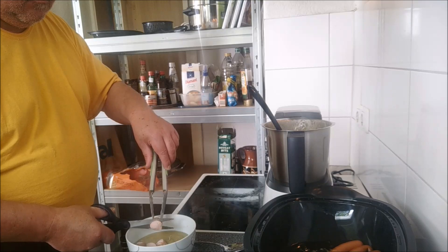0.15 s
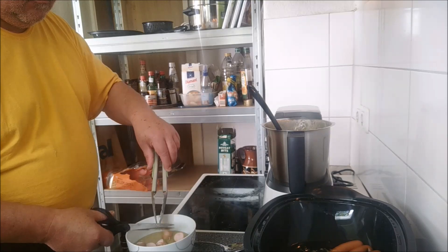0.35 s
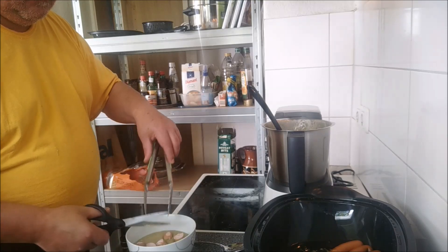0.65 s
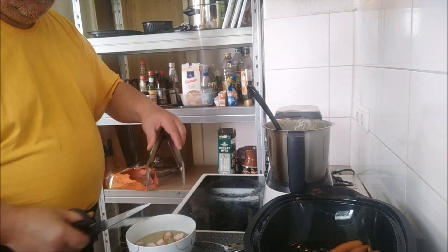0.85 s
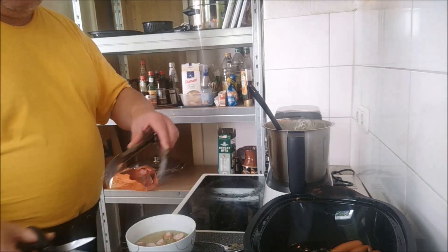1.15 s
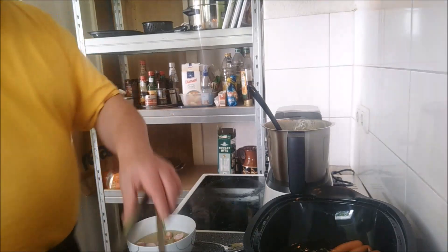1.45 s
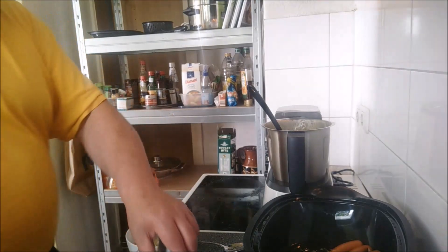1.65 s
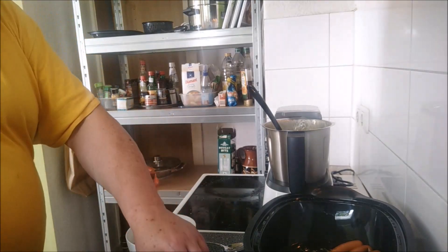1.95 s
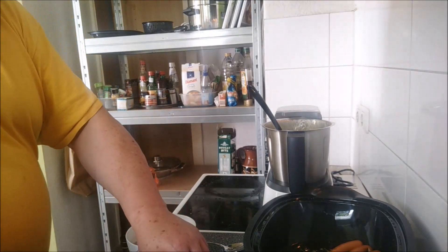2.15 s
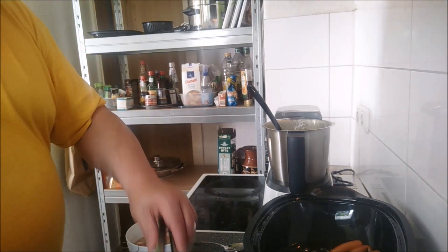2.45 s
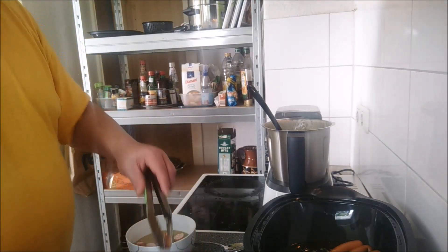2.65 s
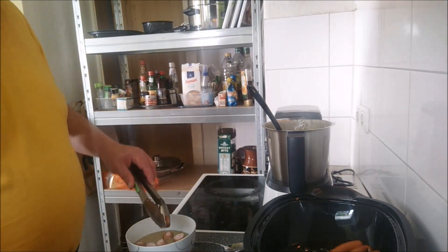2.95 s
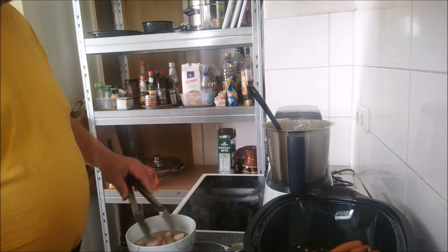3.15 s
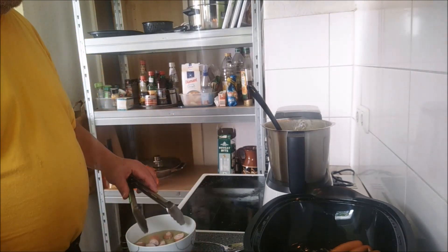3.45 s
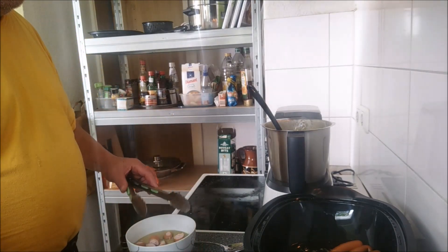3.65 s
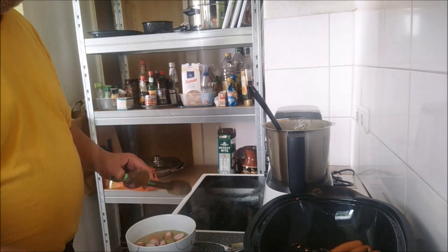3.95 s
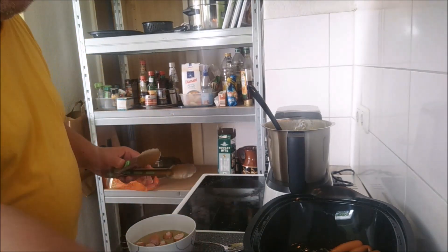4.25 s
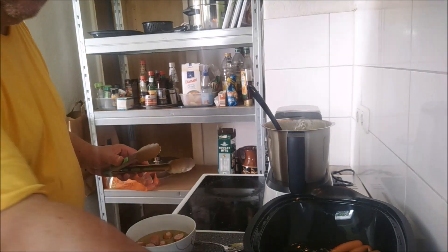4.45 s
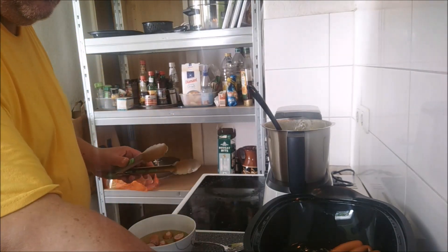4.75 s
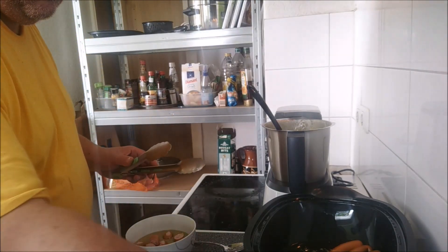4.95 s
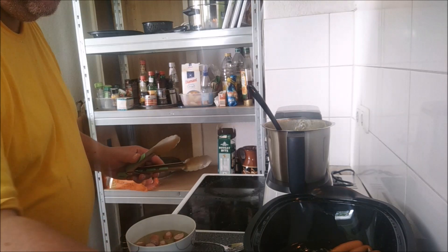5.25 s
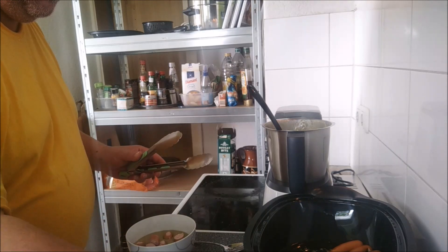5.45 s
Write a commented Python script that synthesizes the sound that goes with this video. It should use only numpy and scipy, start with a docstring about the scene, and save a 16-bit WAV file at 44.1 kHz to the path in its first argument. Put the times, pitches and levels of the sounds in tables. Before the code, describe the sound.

Scissors snip a sausage with a sharp steel click, then slide onto a counter before metal tongs click and clatter in a small tiled kitchen.

```python
"""Steel taps lead: kitchen scissors snip a sausage over a bowl, and tongs click and clatter.
Each tap is a short noise crack with thin rings, a body knock and an answering board; some thump the worktop.
Sleeves and blades rub as gritty noise; the scissors slide onto the counter and are pushed aside.
Small tiled kitchen with a quiet hum of shaped noise; random echoes make the room.
Two microphone ports close together; the recorder widens the stereo bass."""
import sys
import numpy as np
from scipy import signal
from scipy.fft import rfft, irfft
from scipy.io import wavfile
from scipy.ndimage import uniform_filter1d

SR = 44100
rng = np.random.default_rng(int(sys.argv[2]) if len(sys.argv) > 2 else 0)


def wav_out(sig):
    """Save sig, one row per channel (or a flat mono array), as 16-bit PCM at SR to the path in sys.argv[1]."""
    wavfile.write(sys.argv[1], SR, np.round(np.clip(np.atleast_2d(sig).T, -1, 1) * 32767).astype(np.int16))


N = 247312  # length [samples]


def amp(db):
    """Turns decibels into gain."""
    return 10 ** (np.asarray(db) / 20)


def evened(x):
    """Scales to rms 1."""
    return x / np.sqrt(np.mean(x ** 2) + 1e-20)


def peaked(x, db):
    """Scales to a peak level in dB."""
    return amp(db) * x / np.abs(x).max()


def read(points, hz):
    """Reads a table over frequency, on a log frequency axis."""
    f, value = np.transpose(points)
    return np.interp(np.log(hz + 1), np.log(f + 1), value)


def colour(x, points):
    """Filters by a table of dB over frequency, without delay."""
    size = x.shape[-1]
    gain = amp(read(points, np.fft.rfftfreq(size, 1 / SR)))
    return irfft(rfft(x) * gain, size)


def curve(points):
    """Reads a (time, level) table at every sample."""
    times, levels = np.transpose(points)
    return np.interp(np.arange(N) / SR, times, levels)


def ring(t, hz, db, t60):
    """A struck mode: a sine that loses 60 dB in t60 seconds."""
    return amp(db - 60 * t / t60) * np.sin(2 * np.pi * hz * t)


def grit(grain_db, size):
    """Stereo noise whose loudness jumps from one snag of the surface to the next."""
    snags = evened(uniform_filter1d(rng.standard_normal(N), size))
    return evened(rng.standard_normal((2, N)) * amp(grain_db * snags))


def tap(row, noise, lead):
    """A crack of tiny contacts in steel; the struck body knocks and the board under it answers.

    Gives the sound heard straight and the sound sent to the walls, which sums all directions to an even click.
    """
    # broad humps of hand-damped steel: (frequency [Hz], level [dB])
    steel = [(4800, -6), (5000, -1), (5600, -1), (6500, -2), (7900, 1), (9000, -4)]
    # thin rings of the steel: (frequency [Hz], level [dB], t60 [s])
    tines = [(3910, -8, 0.034), (4850, -2, 0.053), (5290, -7.5, 0.036), (5970, -17, 0.045),
             (7100, -22, 0.02), (8200, -19, 0.023), (8970, -6, 0.029), (10500, -12, 0.032),
             (11700, -12, 0.027)]
    # shelf board or bowl under the blow: (frequency [Hz], level [dB], t60 [s])
    board_modes = [(571, -24, 0.084), (586, -6.5, 0.044), (747, 6, 0.021), (825, -5, 0.024)]
    dip_db = -4.5  # the crack near 4 kHz, below the steel humps

    _, crack_db, heft_db, edge_db, knock_hz, knock_db, board_db = row
    t = np.arange(len(noise)) / SR
    spectrum = [(900, heft_db - 46), (2300, heft_db), (3300, heft_db), (3600, dip_db), (4400, dip_db),
                *steel, (10000, edge_db), (15600, edge_db - 7.0)]

    burst = noise * amp(-60 * t / 0.011)
    burst /= np.linalg.norm(burst)
    click = 1.0 * (t == 0)
    rings = np.zeros(len(t))
    # each tap excites each ring a little differently
    for (hz, db, t60), grip in zip(tines, noise[-len(tines):]):
        rings += ring(t, hz, db - 36 + 3 * grip, t60)
    # the lead leaves room for the filter's pre-ringing
    crack = colour(np.roll([burst + rings, click + rings], lead, 1), spectrum)

    knock = ring(t, knock_hz, 0, 15 / knock_hz)
    knock += ring(t, 1.44 * knock_hz, -16, 0.014)
    knock += ring(t, 0.85 * knock_hz, -9, 0.016)
    knock *= (1 - np.exp(-2 * t * knock_hz)) ** 2  # a soft contact takes about a cycle

    board = sum(ring(t, *mode) for mode in board_modes)
    board *= (1 - np.exp(-t / 0.0008)) ** 2

    body = peaked(knock, knock_db - 1.5) + peaked(board, board_db - 11.0)
    body_share = amp([[3], [-2.5]])  # straight, to the walls
    return amp(crack_db) * (peaked(crack, 7.4) + np.roll(body, lead) * body_share)


def taps():
    """Every tap, straight to both ports and through the room; taps take turns through three random echo patterns."""
    # taps of scissors and tongs; levels stand ahead of the fixed offsets in tap() and below:
    # (time [s], crack level [dB], heft: crack filter at 2.3-3.3 kHz [dB], edge: crack filter at 10 kHz [dB],
    #  knock frequency [Hz], knock level re crack level [dB], board level re crack level [dB])
    strikes = [(0.2434, -40.5, -14, 21, 2135, -5.5, -36), (0.2533, -38, -22, 9, 1440, -19, -34),
               (0.2821, -22, -17, -1, 1720, -32, -49), (0.832, -51, 1, -9, 1000, -2, 0),
               (1.3879, -35.5, 0, -11, 1770, -13.5, -6.5), (1.9315, -38, 8, -28, 1660, 10.5, 11.5),
               (2.9153, -72.5, -11, -9, 1470, 13, -4), (3.2012, -33.5, -28, -0.5, 2087, -12.5, -17),
               (3.3098, -40, -11, -20, 1780, -27, -47), (3.3692, -13, 0, -2.5, 1370, -12.5, -15.5),
               (3.5162, -46, -6, -2.5, 1440, -10, -11), (3.5968, -44.5, 2, -4, 1390, -8, -8),
               (3.6406, -43, 0, -4.5, 1310, -9, -8), (3.777, -60.5, 8, -12, 1750, 8, 0),
               (3.8443, -24.5, 3, 7.5, 1213, -6.5, 3.5), (4.0048, -50.5, -22, 0, 1410, -8, 4),
               (4.0444, -68, -12, -9, 1250, 12, 21), (4.4352, -50.5, 3.5, -31, 1170, 7, 1),
               (4.5335, -23.5, -0.5, -9, 1675, -4.5, -10.5), (4.572, -14, -4.5, -4, 1652, -12, -54),
               (4.6186, -12, -9, 1, 1370, -17.5, -57), (4.708, -33.5, -3, -5, 960, -20, -36),
               (4.7399, -32, -10, -28, 1240, -14, -40), (4.8298, -22, 3, -1, 1830, -7, -54),
               (4.8819, -15, -3, 3, 1646, -16.5, -44), (5.0182, -26, 2.5, -3.5, 1630, 2.5, -35)]
    lag, lead = 7, 40  # the left port hears a tap this late; each tap is placed this early [samples]
    pan = amp([[2], [-2]])  # left over right by 4 dB

    straight, sends = np.zeros((2, N)), np.zeros((3, 2, N))
    noise = rng.standard_normal((len(strikes), 4096))
    for k, row in enumerate(strikes):
        near, sent = tap(row, noise[k], lead)
        start = round(row[0] * SR) - lead
        span = slice(start, start + len(near))
        straight[:, span] += [near, np.roll(near, -lag)] * pan
        sends[k % 3, :, span] += sent * pan
    echoes = sum(room(send) for send in sends)
    return amp(1.0) * straight + amp(7.5) * echoes


def thumps():
    """Heavier taps shake the worktop under the recorder, which one port feels far more than the other."""
    # blows that reach the worktop: (time [s], level ahead of the thump's own peak level [dB])
    hits = [(1.3873, -34.5), (1.9318, -54.5), (3.3689, -50.5), (3.6395, -56), (3.8454, -41),
            (4.0043, -58.5)]
    # modes of the worktop: (frequency [Hz], level [dB], t60 [s])
    counter = [(71.4, -6, 0.054), (119, -4.5, 0.075), (157, 1, 0.042), (265.3, 1.5, 0.062),
               (320, 10.5, 0.016)]

    t, blows = np.arange(SR) / SR, np.zeros(N)
    for time, db in hits:
        blows[round(time * SR)] = amp(db)
    thump = sum(ring(t, *mode) for mode in counter)
    thump *= (1 - np.exp(-t / 0.0035)) ** 2  # soft onset
    shaken = signal.oaconvolve(blows, peaked(thump, 4.8))[:N]
    felt = shaken * np.array([[0.9], [-0.15]])  # the right port moves the opposite way
    return felt + amp(-3.0) * room(felt)


def rubbing():
    """Cloth and blades rub: a gritty hiss with a duller part under it; each stroke swells, holds and dies."""
    # strokes of blade or sleeve, levels ahead of the straight and room gains:
    # (time at full level [s], swell [s], held [s], hiss level [dB], duller part re hiss [dB])
    rubs = [(0.243, 0.021, 0.0029, -49, -10), (0.28, 0.007, 0.0035, -56, -17),
            (0.783, 0.073, 0.15, -62, -7.5), (0.938, 0.04, 0.048, -54.5, -16),
            (1.059, 0.1, 0.0073, -52.5, -13.5), (1.168, 0.077, 0.0057, -71, -10),
            (1.4, .01, 0.031, -59, -3), (1.601, 0.056, 0.0055, -42, -9.5),
            (3.854, 0.018, 0.0017, -45.5, 1.5), (3.897, 0.033, 0.0019, -46.5, -1.5),
            (4.53, 0.083, 0.051, -55.5, 2.5), (4.739, 0.039, 0.0065, -52, -7.5),
            (4.88, 0.041, 0.045, -52, -1.5)]
    # clothes moving all along: (time [s], level [dB])
    rustle = [(0.0, -83.5), (0.76, -80), (1.54, -81.5), (1.78, -73), (1.89, -55), (2.01, -55.5),
              (2.14, -60), (2.46, -67.5), (2.65, -73.5), (3.3, -78), (3.48, -65), (3.65, -70.5),
              (4.27, -78), (4.49, -72), (4.7, -58), (5.04, -55), (5.12, -65.5), (5.6, -66)]
    # spectrum of the hiss: (frequency [Hz], density [dB per Hz])
    hiss_spectrum = [(1470, -18), (2500, -15.5), (3430, -12.5), (4380, -5.5), (4780, -9.5), (8040, -3.5),
                     (14200, -11), (16100, -35), (16500, -54)]
    # spectrum of the duller part: (frequency [Hz], density [dB per Hz])
    dull_spectrum = [(120, -79), (200, -13.5), (727, -6.5), (1170, 0), (1260, -2), (1660, -1), (4000, -11),
                     (5200, -14), (8800, -120)]
    swell_db, fall_db_per_s = 30, 344  # climb during the swell; dying away after the hold

    hiss = evened(colour(grit(0.95, size=60), hiss_spectrum))
    dull = evened(colour(grit(1.3, size=200), dull_spectrum))
    t, strokes = np.arange(N) / SR, np.zeros((2, N))
    for full, swell, held, hiss_db, dull_db in rubs:
        before = np.maximum(full - t, 0)
        after = np.maximum(t - full - held, 0)
        below_db = swell_db / swell * before + fall_db_per_s * after
        strokes += amp(hiss_db - below_db) * (hiss + dull * amp(dull_db))
    # the same noise with its ports swapped
    clothes = amp(curve(rustle)) * (hiss + dull * amp(-1.0))[::-1]
    return amp(-3.0) * strokes + amp(-1.5) * room(strokes) + clothes


def scrape(points, resonances, grain_db):
    """Uneven slips on the worktop sound through the resonances of the dragged tool."""
    hz, t = np.fft.rfftfreq(N, 1 / SR), np.arange(N) / SR
    body = sum(amp(db) / (1 + 1j * (hz - f) / width) ** 2 for f, width, db in resonances)
    slips = evened(irfft(rfft(grit(grain_db, size=300)) * body, N))
    # silent before and after the table, with 2.7 ms fades
    fade = np.clip(np.minimum(t - points[0][0], points[-1][0] - t) / 0.0027, 0, 1)
    stroke = amp(curve(points)) * fade * slips
    return amp(-2.5) * stroke + amp(-1.5) * room(stroke)


def slide():
    """The scissors slide onto the counter: gritty friction through their resonances."""
    # loudness ahead of the gains in scrape(): (time [s], level [dB])
    path = [(1.805, -63), (1.815, -49.5), (1.839, -52.5), (1.925, -56)]
    # resonances: (frequency [Hz], width [Hz], level [dB])
    resonances = [(382, 25, -4), (1260, 310, -11.5), (1690, 240, -0.5), (2220, 180, 3.5), (2510, 100, -5),
                  (2563, 58, -9)]
    return scrape(path, resonances, grain_db=2.0)


def drag():
    """The scissors are pushed aside: rougher friction through more resonances."""
    # loudness ahead of the gains in scrape(): (time [s], level [dB])
    path = [(2.07, -50), (2.074, -46.5), (2.11, -37.5), (2.146, -43.5), (2.18, -69), (2.242, -66.5),
            (2.75, -85)]
    # resonances: (frequency [Hz], width [Hz], level [dB])
    resonances = [(291, 15, -0.5), (360, 37, 2.5), (532, 30, 5.5), (825, 76, 4), (1086, 92, 2),
                  (1410, 92, 4), (1750, 130, 6), (2120, 150, 0), (2550, 76, -3), (3560, 230, -11.5)]
    return scrape(path, resonances, grain_db=3.4)


def hum():
    """Steady air and appliances: shaped noise, unrelated at the two ports, with drifting patches."""
    # spectrum of the hum: (frequency [Hz], density [dB per Hz])
    spectrum = [(8.8, -42), (15, 2.5), (98, -3.5), (171, -14), (250, -11), (462, -14), (505, -15.5),
                (855, -13.5), (1290, -18), (1730, -19), (4410, -25.5), (4820, -26.5), (13100, -30),
                (15100, -30.5), (16500, -33)]
    frames, hz = N // 512 + 5, np.fft.rfftfreq(2048, 1 / SR)
    a, b, c, d, patches = rng.standard_normal((frames, 1025, 5)).T
    # smooth over frequency, then over time
    patches = evened(uniform_filter1d(uniform_filter1d(patches, 16, 0), 10, 1))
    level_db = read(spectrum, hz)[:, None] + 2.73 * patches
    bins = np.array([a + 1j * b, c + 1j * d]) * amp(level_db)
    noise = signal.istft(bins, nperseg=2048, noverlap=1536)[1][:, :N]
    return amp(-64.5) * evened(noise)


def room(x):
    """Dense echoes of random sign, strong at first from the near tiles, each band dying at its own speed."""
    # reverberation of the kitchen: (frequency [Hz], t60 [s])
    decay = [(100, 0.41), (250, 0.49), (660, 0.32), (1740, 0.28), (4590, 0.21), (9000, 0.2), (15000, 0.15)]
    size = SR // 2
    echoes = np.zeros((2, size))
    # one echo in every 4 samples, from 70 samples on
    at = np.arange(70, size - 4, 4) + rng.integers(0, 4, (2, (size - 71) // 4))
    np.put_along_axis(echoes, at, rng.choice([-1., 1.], at.shape), 1)
    echoes *= 1 + 1.5 * np.exp(-np.arange(size) / SR / 0.01)
    hz, t, bins = signal.stft(echoes, SR, nperseg=256)
    fading = bins * amp(-60 * t / read(decay, hz)[:, None])
    tail = signal.istft(fading, SR, nperseg=256)[1]
    return signal.fftconvolve(x, tail / np.linalg.norm(tail[0]), axes=1)[:, :N]


def scene():
    """All sources at the two ports; the cook stands to the left."""
    leftward = amp([[1.5], [-1.5]])
    return taps() + thumps() + (rubbing() + slide() + drag() + hum()) * leftward


def record(dry):
    """The difference of the ports is lifted in the bass, their balance varies with pitch; then the band limit."""
    # gain on half of left minus right: (frequency [Hz], gain [dB])
    widen = [(60, 15.5), (110, 16), (200, 7), (380, 5.5), (700, 5), (1290, -0.5), (2380, -0.5), (4400, 0.5),
             (8120, 0.5), (15000, -0.5)]
    # left port over right port: (frequency [Hz], level difference [dB])
    lean = [(110, 0.46), (300, -2.5), (700, 2), (1290, -1), (2380, 1.5), (4400, -1), (8120, 6),
            (15000, -7.5)]
    # the top of the treble falls away steeply above 15.6 kHz: (frequency [Hz], gain [dB])
    top = [(15600, 0), (16000, -22)]

    mid = colour((dry[0] + dry[1]) / 2, top)
    side = colour(colour((dry[0] - dry[1]) / 2, widen), top)
    half_lean = np.array(lean) / [1, 2]  # half up on the left, half down on the right
    left = colour(mid + side, half_lean)
    right = colour(mid - side, half_lean * [1, -1])
    band_limit = signal.firwin(301, 16600, window=("kaiser", 9), fs=SR)  # low-pass at 16.6 kHz
    return signal.oaconvolve(np.array([left, right]), band_limit[None], "same")


dry = scene()
out = record(dry)
wav_out(out)
```